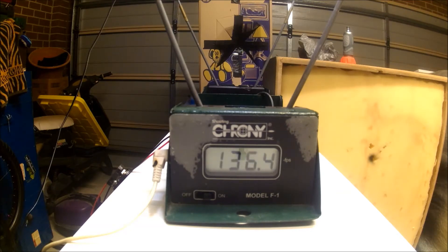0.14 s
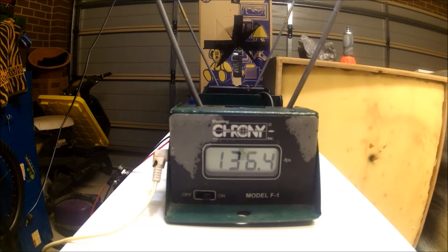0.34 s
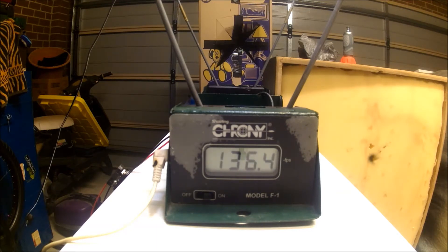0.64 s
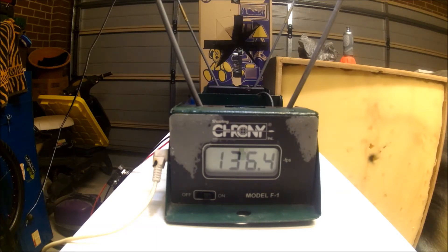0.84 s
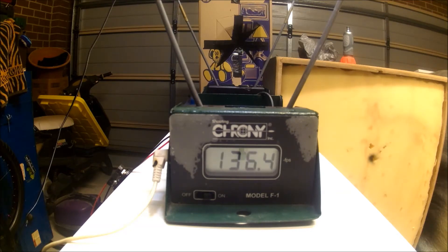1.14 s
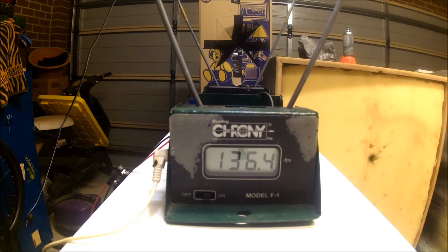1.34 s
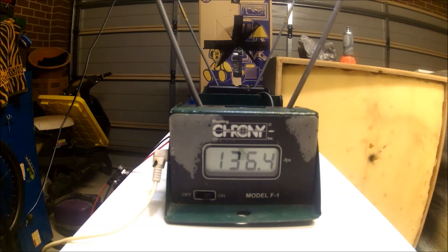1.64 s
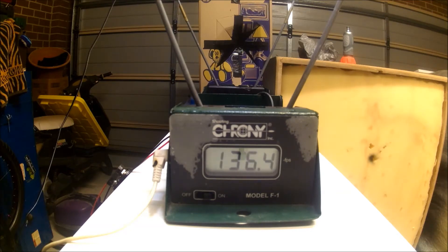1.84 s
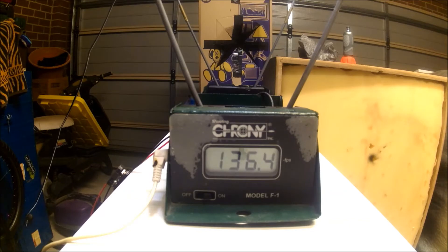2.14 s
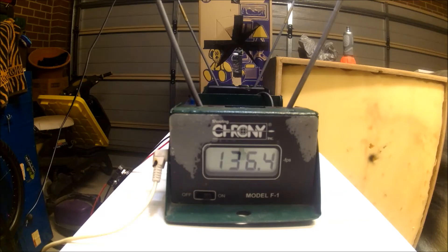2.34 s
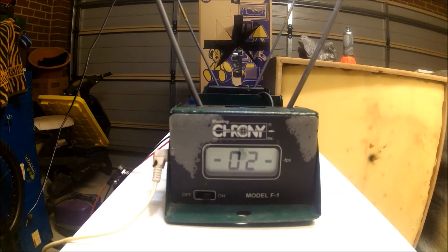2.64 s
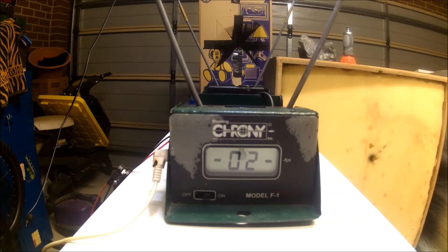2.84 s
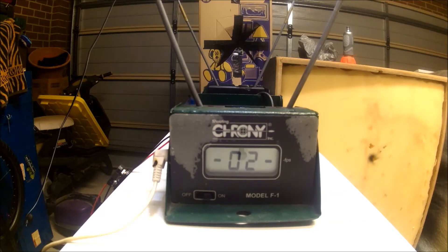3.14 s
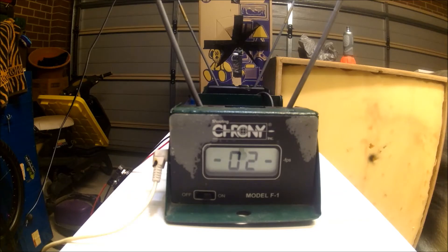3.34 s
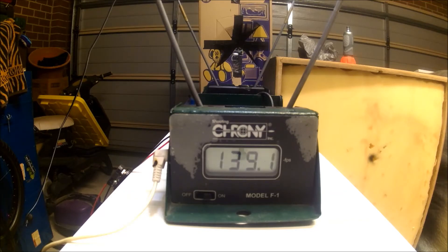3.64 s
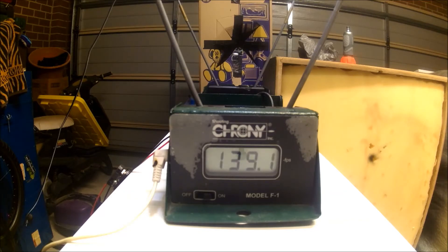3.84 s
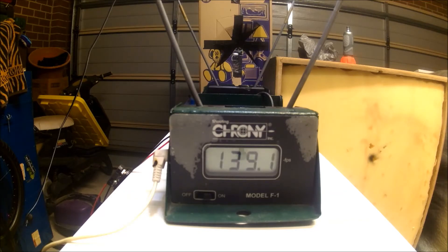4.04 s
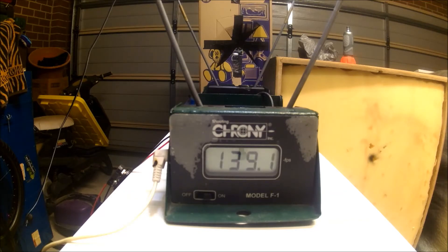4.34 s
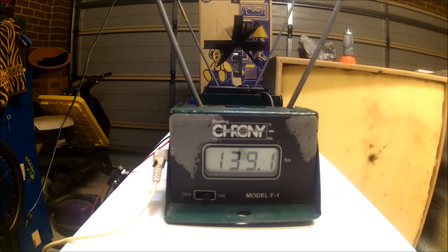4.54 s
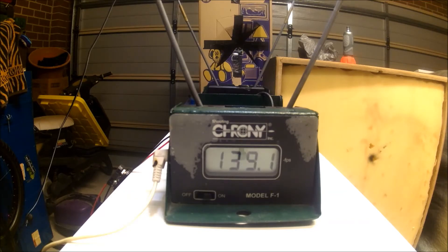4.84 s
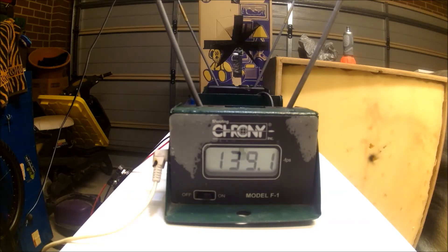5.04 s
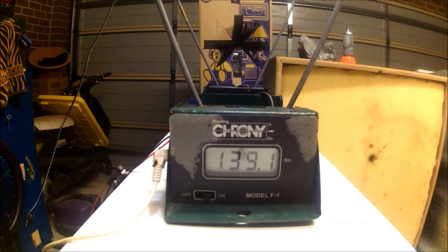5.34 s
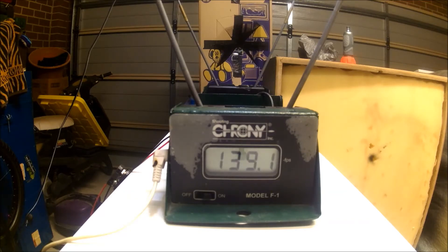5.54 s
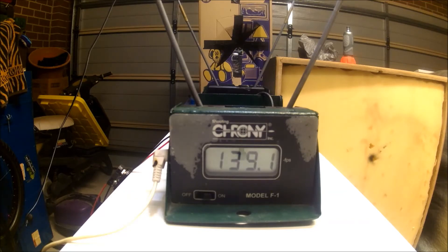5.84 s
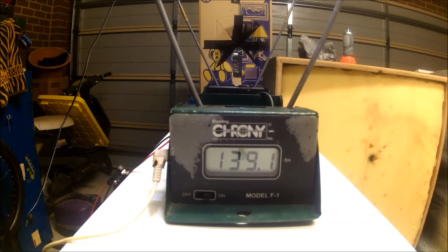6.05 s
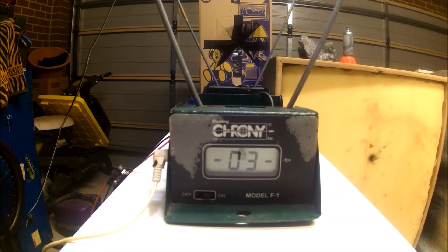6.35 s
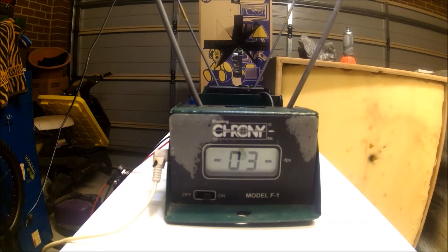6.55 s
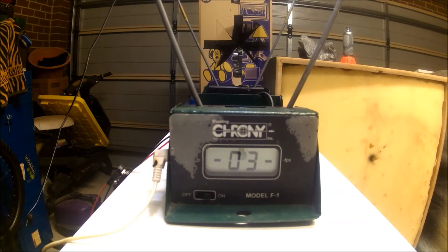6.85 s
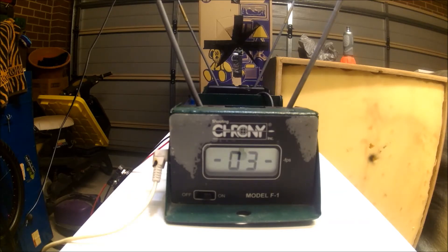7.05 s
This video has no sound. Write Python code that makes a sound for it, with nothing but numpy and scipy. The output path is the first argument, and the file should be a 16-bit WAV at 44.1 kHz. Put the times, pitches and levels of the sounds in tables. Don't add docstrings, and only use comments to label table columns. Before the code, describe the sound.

A toy foam-dart blaster fires twice in a garage, each sharp pop and slam followed by a metal door clang and plastic slide clicks.

```python
import sys
import numpy as np
from scipy import signal
from scipy.fft import rfft, irfft, next_fast_len
from scipy.io import wavfile
from scipy.ndimage import uniform_filter1d

SR = 44100
rng = np.random.default_rng(int(sys.argv[2]) if len(sys.argv) > 2 else 0)


def persist_wave(psi):
    counts = np.round(np.clip(psi, -1, 1) * 32767).astype(np.int16)
    wavfile.write(sys.argv[1], SR, np.atleast_2d(counts).T)


def invert_db(x):
    u = np.asarray(x, float) / 20
    return 10 ** u


N = 316638

# (frequency [Hz], density [dB per Hz])
HISS_COLOUR = [(12, -30), (22, 1.5), (59, 0), (144, -4), (219, -8), (420, -11), (1450, -19.5), (5000, -25),
               (9600, -26.5), (12000, -24), (15500, -27)]
# (frequency [Hz], level [dB rms])
HUM_TONES = [(59.5, -63), (136, -67.5), (398, -72)]
# (frequency [Hz], level [dB])
MIC_RESPONSE = [(60, -8), (200, 0), (600, 2), (1200, -1), (2200, 0), (2900, -3), (4000, -1), (7000, -2),
                (12000, -2), (16000, -3)]
# (frequency [Hz], t60 [s])
GARAGE_DECAY = [(100, .33), (400, .36), (1000, .36), (2800, .36), (7000, .35), (14000, .28)]

# (time [s], peak level [dB], hardness [dB])
FLOOR_BOUNCES = [(2.509, -17.5, -5.5), (2.529, -42, -3), (2.624, -38, 19), (2.761, -19.5, 2),
                 (2.795, -26, 6), (2.887, -27, -2), (2.914, -31, -2.5), (2.985, -36, 3), (6.244, -38, 0),
                 (6.318, -31, -3), (6.35, -43, -3), (6.408, -41.5, 0), (6.465, -41.5, -3.5)]
# (frequency [Hz], level [dB], t60 [s])
FLOOR_MODES = [(312, -11, .04), (607, 2.5, 0.083), (714, 2, 0.11), (791, 6, 0.097), (953, 11.5, 0.023),
               (1460, -15, 0.082)]
# (frequency [Hz], level [dB])
FOAM_COLOUR = [(2300, -1.5), (3000, -10.5), (16000, -11)]

# (time [s], peak level [dB], hardness [dB])
DOOR_HITS = [
    (2.285, 11.5, 1.5),
    (2.308, 14, -1.5),
    (2.326, 13, -2.5),
    (2.352, 11.5, 0.5),
    (5.979, 20, -6.5),
    (6.01, 16, 1),
    (6.045, 9.5, 2),
    (6.067, 7, 4.5),
    (6.084, 4.5, 4),
]
# (frequency [Hz], level [dB], t60 [s])
DOOR_PANEL = [(266, -8, .3), (570, 12, 0.022), (700.4, 7.5, 0.12), (920, 4, 0.059)]
# (frequency [Hz], level [dB], t60 [s])
DOOR_HUM = [(518, -38, 2.4), (537, -41, 1.8), (566, -40, 1.5), (640, -39, 1.2)]
# (frequency [Hz], level [dB])
DOOR_COLOUR = [(150, -14.5), (300, -13.5), (540, -8.5), (800, -8.5), (1200, -4), (2000, -12.5), (3000, -30)]
# (frequency [Hz], t60 [s])
DOOR_DECAY = [(150, 0.65), (350, 0.37), (540, 1.8), (700, 2.1), (1000, 0.7), (2000, 1.2)]

# (time [s], peak level [dB], hardness [dB])
GRIP_BUMPS = [
    (.108, -22, 3),
    (.13, -28, -5),
    (3.172, -59, 19),
    (3.472, -31, -3),
    (3.562, -20, 7.5),
    (3.908, -46, 1),
    (3.979, -36, -12),
    (4.713, -49.5, 13.5),
    (6.893, -33, 3.5),
    (7.041, -23, 9.5),
]
# (time [s], peak level [dB], hardness [dB])
PALM_THUMPS = [
    (.073, -30, -3),
    (2.761, -38, 12),
    (6.32, -40, -0.5),
    (6.352, -42, 3),
]
# (first touch [s], its level [dB], seated [s], its level [dB])
LOADINGS = [
    (.003, -31, .097, -14.5),
    (3.99, -28.5, 4.096, -22),
]
# (latch [s], latch level [dB], slide back [s], slide locked [s], hardness of pull [dB])
COCKINGS = [
    (3.2715, -17, 3.376, 3.5305, 1.5),
    (6.652, -21.5, 6.874, 7.0305, -3.5),
]
# (frequency [Hz], level [dB], t60 [s])
SHELL_MODES = [(329, -32, 0.022), (557, -2.5, 0.11), (703, 0.5, 0.049), (944, 10.5, 0.017),
               (1144, -4.5, 0.029), (1436, 5.5, 0.022), (2024, 8, 0.013), (2305, 3.5, 0.036),
               (4000, -15, 0.0089)]
# (frequency [Hz], level [dB], t60 [s])
LATCH_MODES = [(849, -1.5, 0.098), (1280, -16.5, 0.015), (2100, 7.5, 0.018), (6660, 4, 0.013),
               (8500, -12, 0.028), (10980, 1, 0.051)]
# (dull level [dB], bright level [dB])
LOAD_RUB_START_DB = (-41.5, -47)

# (time [s], level [dB])
POPS = [
    (2.2301, -3.5),
    (5.9092, -4),
]
# (frequency [Hz], level [dB], t60 [s])
SPRING_MODES = [(239.3, -1, 0.29), (558.6, -1.5, .1), (1989, -8, 0.16), (2118, -7, 0.11),
                (3332, -6.5, 0.017), (4036, -12, 0.14)]

BAND_HZ = [150, 420, 1400, 4500, 16500]
# (lows [dB], upper mids [dB], highs [dB])
CONTACT_TONE_DB = dict(slam=(-7, 3.5, 0), door=(-12.5, -14.5, -9), floor=(-9, -13, -17),
                   latch=(-25, -5, -5), catch=(-23, -2, -16), lock=(-24.5, -2.5, -11.5),
                   seat=(-9, -2.5, -28), grip=(-18, -13, -24), palm=(7, -13, -27.5))
CONTACT_S = dict(slam=.009, door=.013, floor=.022, latch=.003, catch=.004, lock=.005, seat=.006, grip=.004, palm=.014)

# (ducks [s], lets go [s])
DUCKS = [
    (2.254, 2.53),
    (5.942, 6.245),
]
# (time [s], level [dB])
CEILING_DROPS = [
    (2.254, -6.5),
    (5.942, -5),
    (5.978, -2.5),
    (5.992, -7.5),
]

WHINE_HZ, WHINE_DB = 13001, -57.5
SLIP_HZ, SLIP_SHARE = 80.35, 0.14
HISS_DB = -53.5
LATCH_REBOUND_S, LATCH_REBOUND_DB = .007, -14
CATCH_DB, CATCH_LEAD_S, CATCH_LEAD_DB = -12, 0.018, -28.5
LOCK_DB, LOCK_LEAD_S, LOCK_LEAD_DB = -7.5, .006, -17
SECOND_TOUCH_S = .018
PULL_RUB_DB, PUSH_RUB_DB = (-38, -36.5), (-31, -29)
PUSH_S, PULL_FADE_SHARE = 0.048, .55
LOAD_RUB_DB = (-16, -19.5)
RUB_SWELL_DB, RUB_SWELL_DB_PER_S = 13, 330
RUB_FADE_DB_PER_S = (280, 214)
POP_WIDTH_S, BARREL_HZ, BARREL_T60_S = .0003, 1150, .04
SLAM_LAG_S, SLAM_DB = .004, 20.5
REST_DB, DUCK_DB, SETTLE_DB, SETTLE_S = -2.5, -19.5, -10.5, 0.082
OPEN_CEILING_DB, STEP_S, STEP_DB = -.6, .048, 3.2


def rms_one(x):
    return x / np.sqrt(np.mean(x ** 2) + 1e-20)


def at_hz(points, hz):
    table_hz, values = np.transpose(points)
    return np.interp(np.log(hz), np.log(table_hz), values)


def band(x, low_hz, high_hz):
    sos = signal.butter(2, [low_hz, high_hz], "band", fs=SR, output="sos")
    return signal.sosfilt(sos, x + 1e-18)


def ring(x, hz, t60):
    r, w = invert_db(-60 / (t60 * SR)), 2 * np.pi * hz / SR
    return signal.lfilter([0, np.sin(w)], [1, -2 * r * np.cos(w), r * r], x + 1e-18)


def coloured(x, points):
    size = 2 * next_fast_len(N // 2 + SR // 10)
    hz = np.maximum(np.fft.rfftfreq(size, 1 / SR), 1)
    cepstrum = irfft(np.log(invert_db(at_hz(points, hz))), size)
    cepstrum[1:size // 2] *= 2
    cepstrum[size // 2 + 1:] = 0
    response = np.exp(rfft(cepstrum))
    return irfft(rfft(x, size) * response, size)[:N]


def drift(rate_hz):
    r = np.exp(-2 * np.pi * rate_hz / SR)
    noise = rng.standard_normal(N + SR)
    return rms_one(signal.lfilter([1], [1, -2 * r, r * r], noise)[SR:])


def dense_tail(x, decay, top_hz, build_up_s):
    age, edges = np.arange(SR) / SR, np.geomspace(60, top_hz, num=15)
    white = rng.standard_normal((2, SR))
    tail = np.zeros(SR)
    for k, (low, high) in enumerate(zip(edges, edges[1:])):
        t60 = at_hz(decay, np.sqrt(low * high))
        tail += band(white[k % 2], low, high) * invert_db(-60 * age / t60)
    tail *= 1 - np.exp(-(age / build_up_s) ** 2)
    tail *= np.minimum(1, 10 * (1 - age))
    return signal.fftconvolve(x, tail / np.sqrt(np.sum(tail ** 2)))[:N]


def touches(rows, kind):
    lows_db, upper_db, highs_db = CONTACT_TONE_DB[kind]
    return [(s, db, lows_db, upper_db + hard_db, highs_db + hard_db, CONTACT_S[kind])
            for s, db, hard_db in rows]


def knocks(rows, modes, crack_db, ring_db, rise_s=0.00025):
    s, mids, lows, upper, highs, contact_s = np.transpose(rows)
    out, age = np.zeros(N), np.arange(SR // 10) / SR
    starts = np.round(s * SR).astype(int)
    envelope = np.exp(-np.outer(1 / contact_s, age)) * (1 - np.exp(-age / rise_s))
    strength_db = 2.0 * rng.standard_normal((len(s), len(modes)))
    band_levels = (mids + lows, mids, mids + upper, mids + highs)
    for low_hz, high_hz, levels_db in zip(BAND_HZ, BAND_HZ[1:], band_levels):
        cracks = band(envelope * rng.standard_normal(envelope.shape), low_hz, high_hz)
        cracks *= invert_db(levels_db + crack_db)[:, None] / np.abs(cracks).max(axis=1, keepdims=True)
        for start, crack in zip(starts, cracks):
            out[start:start + len(age)] += crack[:N - start]
        for k, (hz, db, t60) in enumerate(modes):
            if low_hz <= hz < high_hz:
                pushes = np.zeros(N)
                pushes[starts] = invert_db(levels_db + ring_db + db + strength_db[:, k])
                out += (-1) ** k * ring(pushes, hz, t60)
    return out


def electronics():
    t = np.arange(N) / SR
    clock = t + np.cumsum(.0002 * drift(.4) + .00006 * drift(6)) / SR
    slips, part = np.divmod(SLIP_HZ * clock, 1)
    slipped = slips + np.sin(np.pi / 2 * np.minimum(part / SLIP_SHARE, 1)) ** 2
    whine = invert_db(WHINE_DB) * np.sqrt(2) * np.sin(2 * np.pi * WHINE_HZ * clock - np.pi * slipped)
    hum = sum(invert_db(db) * np.sqrt(2) * np.sin(2 * np.pi * hz * t) for hz, db in HUM_TONES)
    hiss = invert_db(HISS_DB) * rms_one(coloured(rng.standard_normal(N), HISS_COLOUR))
    return hiss + whine + hum


def garage(x):
    return dense_tail(x, GARAGE_DECAY, top_hz=17400, build_up_s=0.0014)


def floor_bounces():
    bounces = knocks(touches(FLOOR_BOUNCES, "floor"), FLOOR_MODES, crack_db=-0.5, ring_db=-11, rise_s=0.0035)
    return coloured(bounces, FOAM_COLOUR)


def metal_door():
    strikes = knocks(touches(DOOR_HITS, "door"), DOOR_PANEL + DOOR_HUM, crack_db=-2.5, ring_db=-22.5)
    wash = dense_tail(strikes, DOOR_DECAY, top_hz=3800, build_up_s=0.03)
    return strikes + invert_db(-32.0) * coloured(wash, DOOR_COLOUR)


def handling():
    latch, shell = [], touches(GRIP_BUMPS, "grip") + touches(PALM_THUMPS, "palm")
    for latch_s, latch_db, back_s, lock_s, hard_db in COCKINGS:
        rebound = (latch_s + LATCH_REBOUND_S, latch_db + LATCH_REBOUND_DB, hard_db)
        latch += touches([(latch_s, latch_db, hard_db), rebound], "latch")
        shell += touches([(back_s - CATCH_LEAD_S, CATCH_LEAD_DB, 0), (back_s, CATCH_DB, hard_db)], "catch")
        shell += touches([(lock_s - LOCK_LEAD_S, LOCK_LEAD_DB, 0), (lock_s, LOCK_DB, 0)], "lock")
    for first_s, first_db, seat_s, seat_db in LOADINGS:
        shell += touches([(first_s, first_db, 0), (first_s + SECOND_TOUCH_S, first_db, 0)], "grip")
        shell += touches([(seat_s, seat_db, 0)], "seat")
    shell_knocks = knocks(shell, SHELL_MODES, crack_db=1.5, ring_db=-10)
    return shell_knocks + knocks(latch, LATCH_MODES, crack_db=2.0, ring_db=-8.5)


def rub_levels():
    strokes = []   # (start s, travel s, peak dB, swell dB, share of the fade rate)
    for _, _, back_s, lock_s, _ in COCKINGS:
        pull_s = back_s - CATCH_LEAD_S - .002
        strokes.append((pull_s, 0, np.array(PULL_RUB_DB), 0, PULL_FADE_SHARE))
        strokes.append((lock_s - PUSH_S, PUSH_S - LOCK_LEAD_S, np.array(PUSH_RUB_DB), RUB_SWELL_DB, 1))
    for first_s, _, seat_s, seat_db in LOADINGS:
        peak_db = seat_db + np.array(LOAD_RUB_DB)
        swell_db = (peak_db - LOAD_RUB_START_DB)[:, None]
        strokes.append((first_s, seat_s - first_s, peak_db, swell_db, 1))
    t, levels = np.arange(N) / SR, np.zeros((2, N))
    for start_s, travel_s, peak_db, swell_db, fade in strokes:
        left_s = start_s + travel_s - t
        below_db = np.clip(RUB_SWELL_DB_PER_S * left_s, 0, swell_db)
        fade_db = np.outer(RUB_FADE_DB_PER_S, fade * np.maximum(-left_s, 0))
        levels += invert_db(peak_db[:, None] - np.minimum(below_db + fade_db, 200)) * (t >= start_s)
    return levels


def slide():
    dull, bright = rub_levels()
    sizes = invert_db(1.5 * np.minimum(rng.exponential(1, N), 3))
    slips = (rng.random(N) < 2500 / SR) * sizes * rng.choice([-1, 1], N)
    body = sum(invert_db(db) * ring(slips, hz, t60 * 0.24) for hz, db, t60 in SHELL_MODES if hz < BAND_HZ[3])
    hiss = band(slips + 4.5 * rng.standard_normal(N), 2900, 15000)
    return dull * rms_one(body) + bright * rms_one(hiss)


def plunger_slams():
    slams = touches([(s + SLAM_LAG_S, SLAM_DB, 0) for s, _ in POPS], "slam")
    return knocks(slams, SPRING_MODES, crack_db=2.0, ring_db=-11.5)


def air_pops():
    t, suction = np.arange(N) / SR, np.zeros(N)
    for s, level_db in POPS:
        suction -= invert_db(level_db) * np.exp(-((t - s) / POP_WIDTH_S) ** 2 / 2)
    swing = signal.lfilter([.012], [1, -.994], suction)
    puff = invert_db(-14.0) * swing * band(rng.standard_normal(N), 1500, 15000)
    column = invert_db(-21) * ring(suction, BARREL_HZ, BARREL_T60_S)
    return suction - 1.8 * swing + column + puff


def scene():
    near = handling() + plunger_slams() + slide()
    door, floor = metal_door(), floor_bounces()
    room = garage(invert_db(-4.5) * near + invert_db(-10.0) * door + invert_db(-6) * floor)
    heard = coloured(near + door + floor + room, MIC_RESPONSE)
    return (heard + air_pops() + electronics())[None]


def gain_control():
    t = np.arange(N) / SR
    gain_db, ceiling_db = np.full(N, float(REST_DB)), np.full(N, OPEN_CEILING_DB)
    for duck_s, free_s in DUCKS:
        ducked = (t >= duck_s) & (t < free_s)
        settling = np.exp((duck_s - t[ducked]) / SETTLE_S)
        gain_db[ducked] = SETTLE_DB + (DUCK_DB - SETTLE_DB) * settling
    for s, db in CEILING_DROPS:
        after = t >= s
        steps = (t[after] - s) // STEP_S
        ceiling_db[after] = np.minimum(db + STEP_DB * steps, OPEN_CEILING_DB)
    return uniform_filter1d(invert_db([gain_db, ceiling_db]), size=40)


def roll_off(x):
    return signal.sosfilt(signal.butter(12, 15600, fs=SR, output="sos"), x)


def record(dry):
    gain, ceiling = gain_control()
    limited = np.clip(dry * gain, -ceiling, ceiling)
    coupled = signal.sosfilt(signal.butter(1, 25, "high", fs=SR, output="sos"), limited)
    cut = signal.sosfilt(signal.cheby2(10, 40, 16600, fs=SR, output="sos"), coupled)
    return roll_off(cut)


dry = scene()
out = record(dry)
persist_wave(out)
```